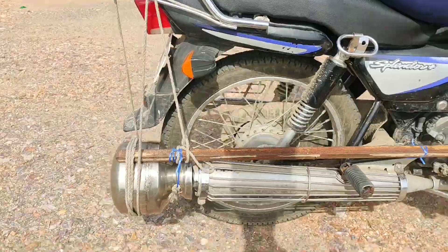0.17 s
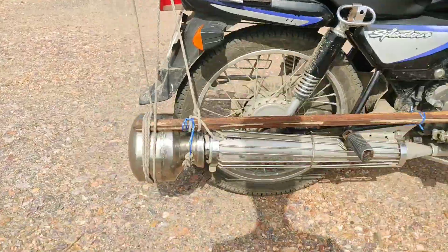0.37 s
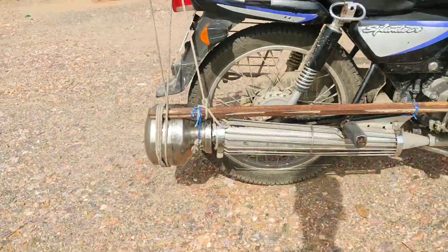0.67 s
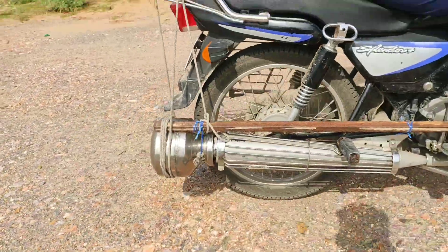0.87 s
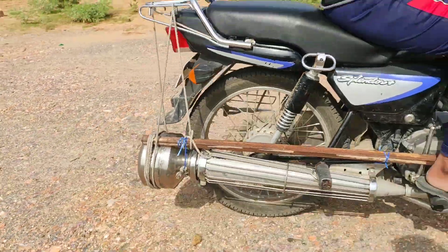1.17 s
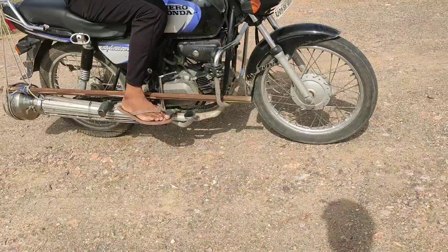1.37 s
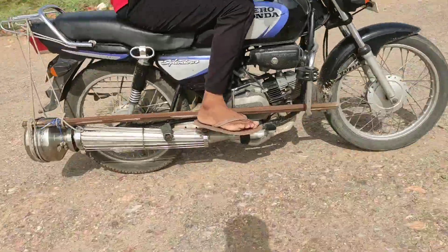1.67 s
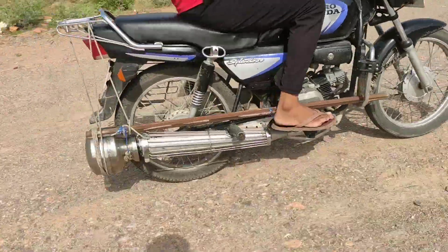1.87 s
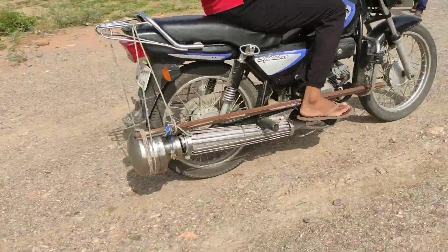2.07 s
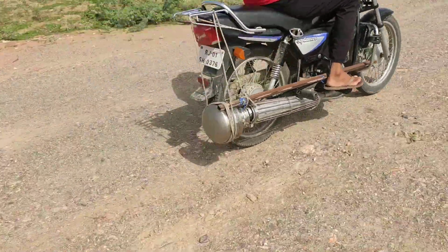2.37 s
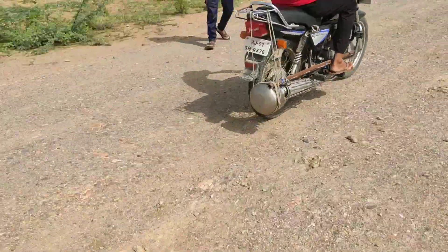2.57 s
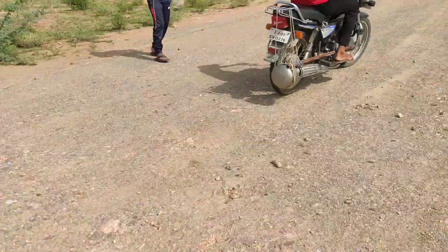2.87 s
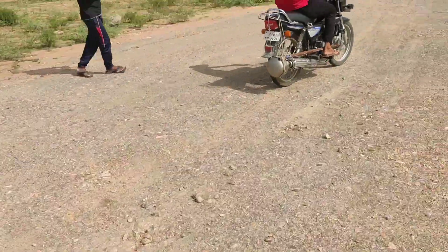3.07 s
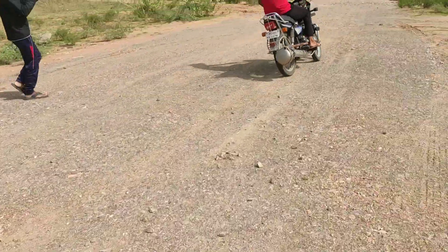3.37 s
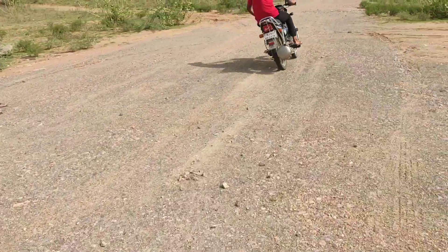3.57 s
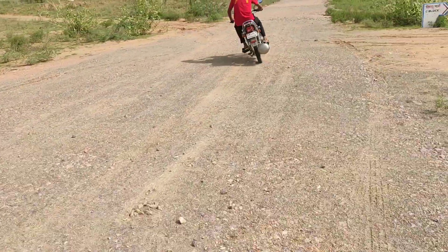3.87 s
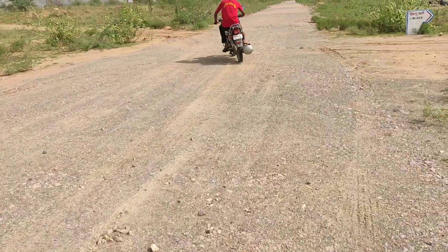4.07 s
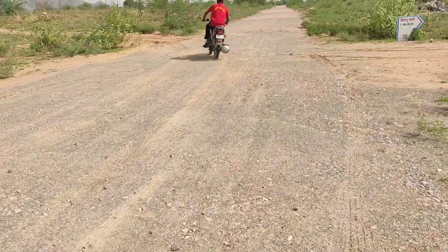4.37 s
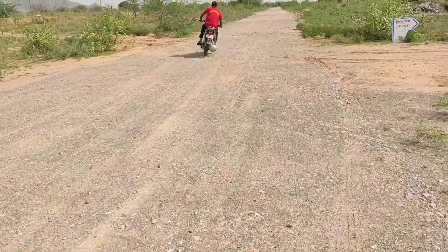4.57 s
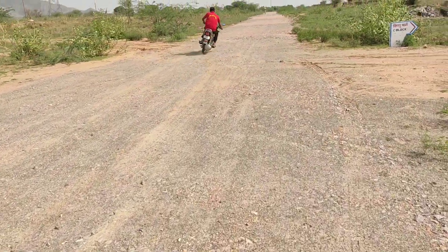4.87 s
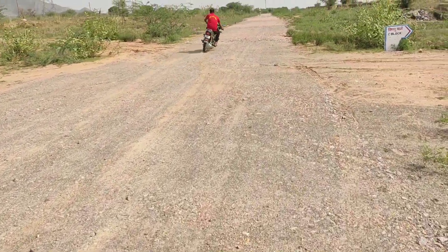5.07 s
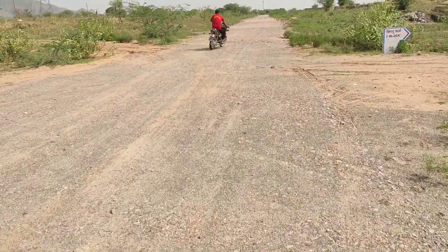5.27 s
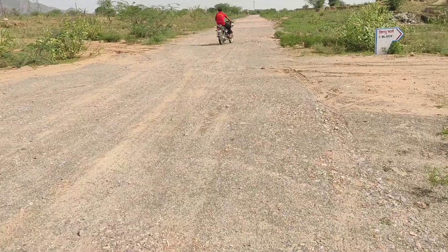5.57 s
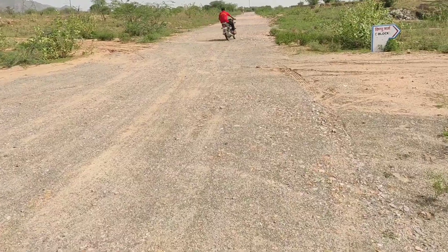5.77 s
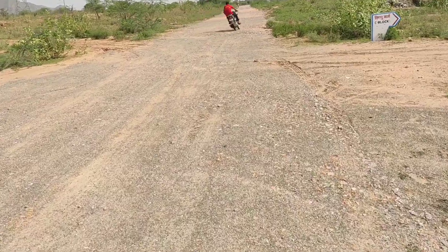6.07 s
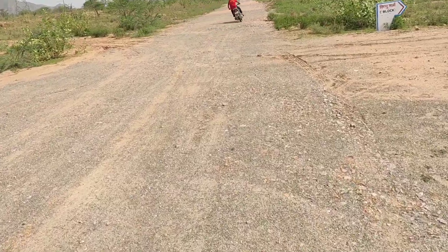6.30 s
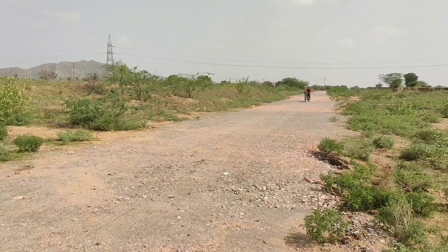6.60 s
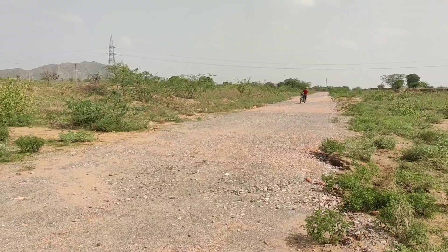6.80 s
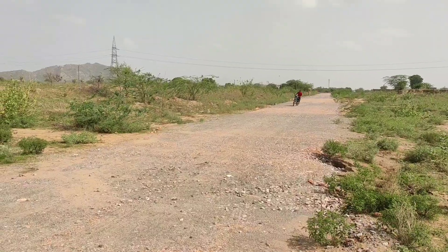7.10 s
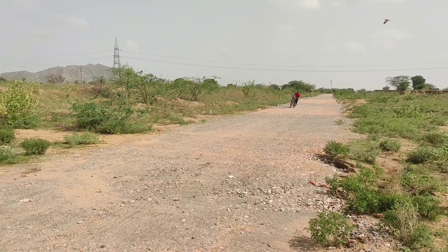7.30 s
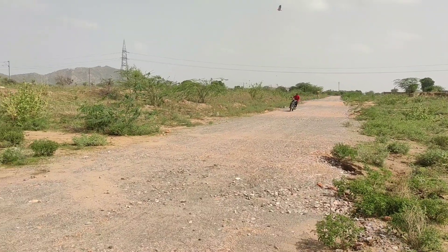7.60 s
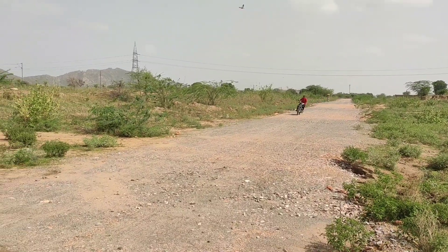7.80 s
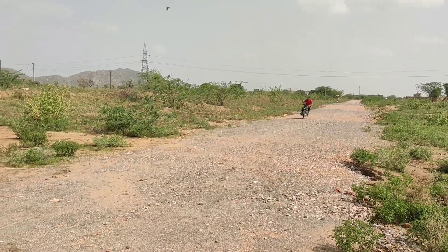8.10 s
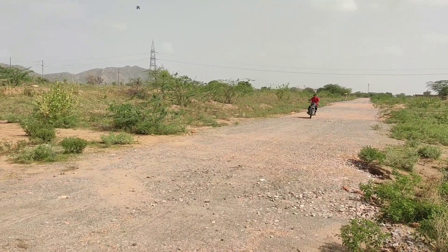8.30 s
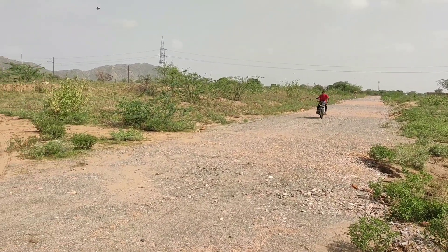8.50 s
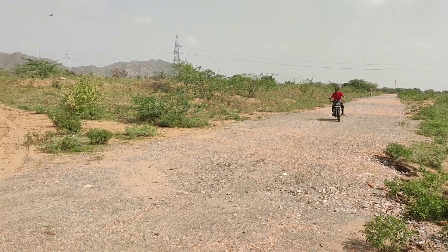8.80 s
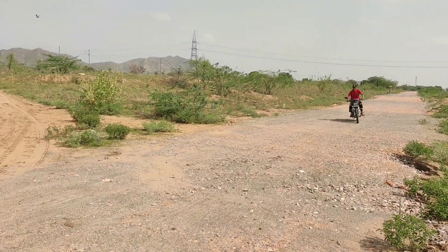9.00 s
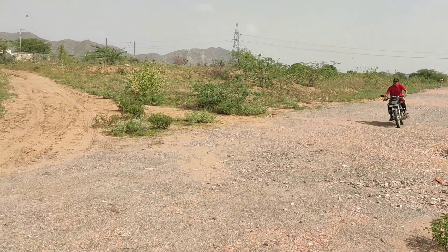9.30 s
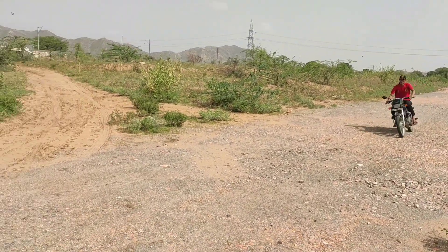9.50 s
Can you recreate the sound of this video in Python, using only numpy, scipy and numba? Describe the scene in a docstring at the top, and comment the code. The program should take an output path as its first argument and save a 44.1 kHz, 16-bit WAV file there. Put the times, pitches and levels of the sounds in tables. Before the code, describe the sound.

Slow pot-like clonks of an idling single-cylinder engine stop abruptly; a short gap, then a deep droning motorcycle ride with wind rumble and gear changes.

```python
"""An open gravel road: a small single-cylinder motorcycle with a steel pot tied over its exhaust.
It idles slowly close by, each firing a burst of decaying pot, pipe and casing modes plus gas noise, over
running-gear noise. It breaks off on a clank; after a short silence the same engine pulls under load through
two gear changes: firing pulses boom in resonators, while filtered noise gives wind, clatter and gear whine."""
import sys
import numpy as np
from scipy import signal
from scipy.fft import rfft, irfft
from scipy.io import wavfile
from scipy.ndimage import uniform_filter1d
from numba import njit

SR = 44100
rng = np.random.default_rng(int(sys.argv[2]) if len(sys.argv) > 2 else 0)


def persist_wave(psi):
    """Save psi, clipped to +-1, as 16-bit WAV."""
    counts = np.round(np.clip(psi, -1, 1) * 32767).astype(np.int16)
    wavfile.write(sys.argv[1], SR, np.atleast_2d(counts).T)


N = 425565

# Levels in the tables are relative; each layer sets its own balance.
# idle firings: t/s, pot ring level/dB, pipe thud level/dB, gas crack level/dB
IDLE_FIRINGS = [(0.038, -17.5, -30, -26.5), (0.225, -17.5, -30.5, -36), (0.397, -17, -30, -33),
                (0.572, -20, -31, -32), (0.765, -14.5, -30, -32), (0.951, -16.5, -31, -35.5),
                (1.12, -16.5, -29, -31.5), (1.295, -15.5, -29, -31.5), (1.474, -16, -29, -33.5),
                (1.653, -31, -38, -50), (1.856, -16, -27.5, -26.5), (2.004, -12.5, -31, -19)]
# valve ticks between firings: t/s, level/dB
VALVE_TICKS = [(0.0159, -36), (0.0704, -25), (0.1296, -35), (0.3087, -33.5), (0.4813, -32.5),
               (0.6644, -35.5), (0.855, -34), (1.0326, -32), (1.2057, -34), (1.3827, -35), (1.5604, -33),
               (1.712, -39), (1.7484, -36), (1.93, -29.5)]
# modes of the air in pipe and pot: f/Hz, level/dB, t60/s
PIPE_MODES = [(62.7, -0.5, 0.41), (112.9, 6, 0.18), (139, -6.5, 0.25), (95, -4.5, .06), (288.3, -20.5, .4)]
# modes of the pot wall: f/Hz, level/dB, t60/s
POT_MODES = [(465, -17, 0.12), (602, -11.5, 0.12), (815, 9.5, 0.042), (1066, 4, 0.067), (1153, 4.5, 0.027),
             (1480, -10.5, 0.13)]
# modes of the engine casing: f/Hz, level/dB, t60/s
CASING_MODES = [(1750, -6, .03), (1980, 0, .04), (2250, 0, .04), (2700, -1, .045), (3300, -6, .03),
                (3800, -8, .025), (4200, -2, .025), (4600, -4, .025), (4900, -4, .025), (5400, -8, .02),
                (8600, -12, .015), (9600, -14, .015)]
# spectrum of the running gear at idle: f/Hz, density level/dB per Hz
GEAR_SPECTRUM = [(88, -35), (150, -19.5), (191, -22.5), (348, -27), (820, -18), (1360, -22), (1520, -18.5),
                 (2510, -39.5), (4320, -31), (5820, -40), (9640, -48), (11200, -56), (13000, -71)]
# a loose part chattering through the first firing, one row: t/s, length/s, level/dB
LOOSE_PART = (.012, .068, -33)
# engine under load: t/s, firing rate f/Hz, exhaust level/dB
LOAD = [(2.17, 35.5, -18), (2.29, 35.6, -17.5), (2.42, 36.76, -16.5), (2.5, 37.32, -14.5),
        (2.79, 39.07, -16.5), (2.86, 40.3, -14.5), (2.92, 38.6, -15), (3.0, 38.24, -16.5),
        (3.06, 36.63, -18), (3.13, 35.75, -18), (3.17, 35.42, -17), (3.25, 34.05, -17), (3.29, 32.47, -17),
        (3.4, 27.74, -19), (3.42, 26.26, -17), (3.44, 25.92, -26.5), (3.46, 25.6, -17.5),
        (3.5, 26.28, -20.5), (3.54, 26.52, -17.5), (3.67, 26.87, -13.5), (3.71, 26.13, -14.5),
        (4.11, 27.75, -14), (4.34, 27.85, -16), (4.4, 28.13, -14.5), (4.73, 29.19, -15), (5.21, 30.82, -15),
        (5.29, 30.67, -17), (5.44, 31.7, -15.5), (5.5, 31.42, -19), (5.65, 31.87, -16), (5.71, 32.38, -17),
        (6.02, 33.28, -16), (6.79, 35.18, -16.5), (6.86, 35.58, -17.5), (6.9, 36.31, -16),
        (7.11, 37.03, -15), (7.75, 39.93, -16), (7.88, 39.33, -19.5), (7.9, 38.46, -19), (8.02, 35.72, -15),
        (8.06, 34.47, -19.5), (8.13, 33.72, -17.5), (8.19, 31.4, -19.5), (8.21, 31.1, -19.5),
        (8.25, 30.97, -18.5), (8.36, 30.65, -17), (8.42, 30.41, -18), (8.58, 31.1, -16),
        (8.71, 31.1, -16.5), (9.13, 31.7, -15), (9.23, 31.7, -14.5), (9.38, 31.7, -18), (9.5, 31.62, -16.5),
        (9.57, 31.8, -15), (9.65, 31.9, -17.5)]
# engine clatter under load: t/s, level/dB
CLATTER_LEVEL = [(2.17, -36), (2.42, -33), (2.64, -34), (2.79, -32), (3.41, -38), (3.55, -37.5),
                 (4.46, -38.5), (5.16, -34), (5.9, -37.5), (6.73, -35.5), (7.16, -31.5), (7.45, -33.5),
                 (7.47, -32), (8.01, -34), (8.24, -40), (8.36, -39.5), (8.63, -40), (8.75, -38.5),
                 (9.0, -38.5), (9.04, -36), (9.08, -39.5), (9.29, -41), (9.43, -39), (9.46, -41),
                 (9.56, -38.5), (9.58, -40)]
# spectrum of that clatter: f/Hz, density level/dB per Hz
CLATTER_SPECTRUM = [(240, -26), (400, -4), (573, -8.5), (782, -8.5), (851, -11.5), (1060, -8.5),
                    (1340, -14), (1570, -9), (2560, -15.5), (3990, -24), (4770, -28.5), (5510, -38.5),
                    (7000, -55.5), (9100, -82.5), (15400, -120)]
# casing buzz under load: f/Hz, width/Hz, level/dB
BUZZ_BANDS = [(1224, 120, 0.5), (2540, 550, -1), (4310, 120, -12.5), (4890, 450, -12.5)]
# exhaust colour over its level: t/s, upper over lower boom level/dB, bass level/dB, shoulder level/dB,
# bark level/dB, low gusts level/dB
EXHAUST_COLOUR = [(2.17, 0, -7.5, -17, -17, -5), (2.5, -6, -7, -14, -19.5, -6.5),
                  (2.85, -3.5, -13, -14.5, -20, -10), (3.15, -5.5, -6, -24, -23.5, -8),
                  (3.45, -4, -8, -10.5, -35, -11), (3.75, -4, -17, -15, -42.5, -9),
                  (4.2, -0.5, -18, -13, -36, -9), (4.7, 0, -14, -13.5, -45.5, -11),
                  (5.2, 1.5, -18, -11.5, -42, -3.5), (5.55, -0.5, -8, -14.5, -27.5, -4.5),
                  (6, -1.5, -8, -18, -28.5, -12), (6.5, -6, -8, -12.5, -26.5, -5),
                  (7, -5, -7.5, -12, -23.5, -7.5), (7.4, -5.5, -15, -11, -24.5, -8.5),
                  (7.8, 0.5, -9, -14.5, -21, 0), (8.1, -9.5, -8, -18, -26, -6.5),
                  (8.4, -4, -6.5, -23, -24.5, -17.5), (8.8, -2, -19.5, -18.5, -25, -5),
                  (9.2, -6.5, -12, -28.5, -24, -10), (9.65, -3, -12, -18.5, -23, -3.5)]
# wind over the exhaust and unevenness of firing: t/s, wind level/dB, timing scatter/cycles
WIND_AND_SCATTER = [(2.17, -14, .004), (2.8, -12, .004), (3.1, -6, .012), (3.5, -4, .02), (3.7, -13, .007),
                    (4.3, -15, .005), (5.2, -15, .005), (5.5, -8, .008), (7, -8, .008), (7.6, -6, .01),
                    (7.9, -3, .022), (8.15, -3, .022), (8.35, -8, .008), (9.65, -8, .009)]
# layers over the clatter: t/s, pot ring level/dB, casing ring level/dB, gear whine f/Hz,
# gear whine level/dB, rasp level/dB
CLATTER_LAYERS = [(2.17, -8, -5, 1736, -9, -18), (2.6, -2, -5, 1790, -10, -16),
                  (2.9, -5, -8, 1806, -16, -19), (3.25, -6, -8, 1778, -14, -17),
                  (3.45, -6.5, -9.5, 1790, -1, -21.5), (3.8, -0.5, -9.5, 1836, -4.5, -17),
                  (4.3, -8, -16, 1885, -6.5, -14), (4.6, -7.5, -9.5, 1924, -12, -22.5),
                  (5.1, -10.5, -16, 2096, -13, -13), (5.6, -12.5, -10.5, 2114, -25, -17),
                  (6, -10, -12.5, 1980, -23, -18), (6.6, -12.5, -19.5, 1995, -22.5, -13),
                  (7.2, -9.5, -24.5, 2030, -23.5, -5), (7.8, -4.5, -26.5, 1985, -16, -5.5),
                  (8.3, -5.5, -17, 2020, -25, -7.5), (9, -6.5, -14, 2006, -32.5, -10),
                  (9.65, -8, -14.5, 1984, -24, -12)]
# pipe note, shifting with gas heat and bearing: t/s, f/Hz
PIPE_NOTE = [(2.17, 152.3), (3.1, 149.8), (3.5, 128.6), (3.8, 157.7), (4.6, 162.4), (5.2, 168), (5.6, 147),
             (6.4, 142), (7.2, 154.6), (7.8, 156.6), (8.2, 140), (9, 155.3), (9.65, 145)]
# treble hiss over the clatter, lost with distance: t/s, level/dB
TREBLE_HISS = [(2.17, -30), (2.9, -33), (3.8, -30), (5.6, -29), (6, -42), (9.65, -46)]

CRACK_AFTER_S, THUD_AFTER_S = 0.0045, 0.0062  # gas crack and pipe thud, after the pot is struck
BREAK_S, RESUME_S = 2.0115, 2.1655  # idle cuts off, loaded engine comes in
POT_LAG_S = 0.0025  # the pot booms after the pipe
TOP_HZ = 15500  # upper limit of the microphone


def undb(db):
    """Decibels to amplitude."""
    return 10 ** (np.asarray(db) / 20)


def unit(x):
    """Scaled to rms 1."""
    return x / np.sqrt(np.mean(x ** 2))


def coloured(spectrum):
    """Noise with the given spectrum, rms 1."""
    hz, db = np.transpose(spectrum)
    log_f = np.log(np.arange(1, N // 2 + 2) * SR / N)
    gain = undb(np.interp(log_f, np.log(hz), db))
    return unit(irfft(rfft(rng.standard_normal(N)) * gain, N))


def walk(rate):
    """Random levels held 1 / rate s and slewed twice; spread near 1."""
    hold = int(SR / rate)
    steps = np.repeat(rng.standard_normal(N // hold + 1), hold)
    return 1.115 * uniform_filter1d(uniform_filter1d(steps, hold), hold)[:N]


def running_gear():
    """Moving parts at idle: a steady coloured noise whose level wanders."""
    return undb(-45.5 + 2.5 * walk(30)) * coloured(GEAR_SPECTRUM)


@njit
def svf(x, hz, width):
    """State-variable band-pass with a moving centre, gain 1 there."""
    y, band_state, low_state = np.empty(len(x)), 0., 0.
    for i in range(len(x)):
        g, k = np.tan(np.pi * hz[i] / SR), width / hz[i]
        v = (band_state + g * (x[i] - low_state)) / (1 + g * (g + k))
        band_state = 2 * v - band_state
        low_state += 2 * g * v
        y[i] = k * v
    return y


def band(x, hz, width_hz):
    """A resonance applied twice: steep skirts, slow build-up."""
    hz = hz * np.ones(N)
    return svf(svf(x, hz, 1. * width_hz), hz, 1. * width_hz)


def add(out, s, x):
    """Mixes x in at time s."""
    i = max(int(s * SR), 0)
    out[i:i + len(x)] += x[:N - i]


def puff(decay_s):
    """A burst of gas noise that swells over a few ms and dies away."""
    t = np.arange(SR // 4) / SR
    return rng.standard_normal(len(t)) * np.exp(-t / decay_s) * (1 - np.exp(-t / .004))


def ring(modes, scatter_db, detune, rise_s):
    """One blow on a set of modes, each struck a little differently; a softer push rises more slowly."""
    t = np.arange(SR // 2) / SR
    hz, db, t60 = np.transpose(modes)[:, :, None]
    pitch_chance, level_chance = rng.standard_normal((2, len(modes), 1))
    wave = np.sin(2 * np.pi * hz * (1 + detune * pitch_chance) * t)
    level = undb(db + scatter_db * level_chance - 60 * t / t60)
    return np.sum(level * wave, axis=0) * (1 - np.exp(-(t / rise_s) ** 2))


def knocks(modes, decay_s, scatter_db, detune):
    """A burst of tiny knocks rings the modes roughly, differently each time."""
    burst = puff(decay_s)[:SR // 20]
    blow = ring(modes, scatter_db, detune, 1e-4)[:SR // 8]
    return signal.fftconvolve(burst, blow) / np.sqrt(decay_s * SR)


def loose_part(gas):
    """A loose part chatters: noise that swells and fades as a rounded arch."""
    s, length_s, db = LOOSE_PART
    count = int(length_s * SR)
    arch = np.sin(np.pi * np.arange(count) / count) ** .5
    add(gas, s, undb(db) * rng.standard_normal(count) * arch)


def valve_tick(out, gas, s, db):
    """A valve knocks the casing with a short puff; a soft pot ring leads it by 20 ms."""
    add(out, s - .022, undb(db - 2) * ring(POT_MODES, 2.5, .02, .004))
    add(out, s - .002, undb(db - 1.5) * knocks(CASING_MODES, .007, 2.5, .05))
    add(gas, s - .002, undb(db - 3) * puff(.012))


def firing(out, gas, push, s, ring_db, thud_db, crack_db):
    """The firing rings the pot; just after, the gas cracks out and the pipe thuds."""
    add(gas, s - .025, undb(-49) * puff(.05))  # the intake hisses as the piston comes up
    add(out, s, undb(ring_db - 9) * ring(POT_MODES, 1.5, .015, .0012))
    add(push, s, undb(ring_db - 19.5) * puff(0.051))
    add(out, s + CRACK_AFTER_S, undb(crack_db + 14) * knocks(CASING_MODES, .005, 2.5, .04))
    add(gas, s + CRACK_AFTER_S, undb(crack_db) * puff(0.017))
    add(out, s + THUD_AFTER_S, undb(thud_db + 5) * ring(PIPE_MODES, 0.47, 0.02, 0.0029))


def pot_rattle(push):
    """The outflow keeps rattling the pot wall after the blow: gas noise through its modes."""
    return undb(14.5) * sum(undb(db) * band(push, hz, 195) for hz, db, _ in POT_MODES)


def idle():
    """Slow firings with valve ticks between them, over the running gear."""
    out, gas, push = np.zeros(N), np.zeros(N), np.zeros(N)
    loose_part(gas)
    for s, db in VALVE_TICKS:
        valve_tick(out, gas, s, db)
    for s, ring_db, thud_db, crack_db in IDLE_FIRINGS:
        firing(out, gas, push, s, ring_db, thud_db, crack_db)
    treble_cut = signal.butter(8, 10300, fs=SR, output="sos")
    gas = signal.sosfilt(treble_cut, band(gas, 2870, 10000))
    return out + gas + pot_rattle(push) + running_gear()


def along(table):
    """Columns of a curve table, one value a sample."""
    s, *columns = np.transpose(table)
    return [np.interp(np.arange(N) / SR, s, c) for c in columns]


def late(x, s):
    """Delayed by s."""
    return np.interp(np.arange(N) - s * SR, np.arange(N), x)


def firing_pulses(turns, hz):
    """One click as each cycle completes, its strength slightly uneven, evened out for firing rate."""
    fired = np.flatnonzero(np.diff(np.maximum.accumulate(np.floor(turns))))
    pulses = np.zeros(N)
    pulses[fired] = undb(1.1 * rng.standard_normal(N // 500)[:len(fired)])
    return pulses / np.sqrt(hz)


def wind(gusts_db):
    """Wind rumble with lower gusts: two low bands of one noise, each wandering in level."""
    air = rng.standard_normal(N)
    rumble = unit(band(band(air, 165, 190), 165, 240))
    gusts = unit(band(band(air, 60, 90), 60, 110))
    rumble_db = along(WIND_AND_SCATTER)[0]
    return undb(rumble_db + 2 * walk(9)) * rumble + undb(gusts_db + 2 * walk(6.8)) * gusts


def exhaust(turns, hz):
    """Firings boom in pipe and then pot, with a bass push below and a bark above; wind rumbles through."""
    upper_db, bass_db, shoulder_db, bark_db, gusts_db = along(EXHAUST_COLOUR)
    pulses = firing_pulses(turns, hz)
    pipe = unit(band(band(pulses, along(PIPE_NOTE)[0], 100), 151.4, 160))
    pot = late(unit(band(band(pulses, 216.2, 86), 211, 130)), POT_LAG_S)
    boom = (pipe + undb(upper_db) * pot) / np.sqrt(1 + undb(2 * upper_db))
    bass = undb(bass_db) * late(unit(band(band(pulses, 50, 55), 50, 70)), 0.0014)
    shoulder = undb(shoulder_db) * late(unit(band(pulses, 292.6, 77)), 0.00584)
    bark = undb(bark_db) * late(unit(band(pulses, 440, 100)), 0.007105)
    growl = undb(bark_db - 9) * late(unit(band(pulses, 720, 260)), .008)
    return boom + bass + shoulder + bark + growl + wind(gusts_db)


def casing_buzz(noise):
    """The casing buzzes under load: noise through a few of its resonances."""
    return unit(sum(undb(db) * unit(band(noise, hz, width)) for hz, width, db in BUZZ_BANDS))


def gear_whine(noise, hz):
    """A narrow noise band that slides in pitch."""
    return unit(band(noise, hz, 110))


def engine_clatter():
    """Broad clatter with hiss, pot ring, casing buzz, gear whine and rasp, all resonances of noise."""
    pot_db, casing_db, whine_hz, whine_db, rasp_db = along(CLATTER_LAYERS)
    noise = rng.standard_normal(N)
    hiss_db = along(TREBLE_HISS)[0] + 2.5 * walk(30)
    hiss = undb(hiss_db) * unit(band(band(noise, 7200, 2200), 7200, 2600))
    pot = undb(pot_db) * unit(band(noise, 787, 64))
    casing = undb(casing_db) * casing_buzz(noise)
    whine = undb(whine_db) * gear_whine(noise, whine_hz)
    rasp = undb(rasp_db + 3 * walk(60)) * unit(band(rng.standard_normal(N), 1050, 770))
    return coloured(CLATTER_SPECTRUM) + hiss + pot + casing + whine + rasp


def ride():
    """Exhaust below; clatter, buzz and gear whine swell slightly once a cycle above."""
    hz, boom_db = along(LOAD)
    clatter_db, = along(CLATTER_LEVEL)
    running = np.arange(N) > RESUME_S * SR
    turns = np.cumsum(hz * running) / SR + .95  # in firing cycles
    turns += along(WIND_AND_SCATTER)[1] * walk(30)  # uneven timing
    swell = 1 + 0.052 * np.cos(2 * np.pi * (turns - .3))
    clatter_gain = undb(clatter_db + 1 + 0.43 * walk(20)) * swell
    return undb(boom_db) * exhaust(turns, hz) + clatter_gain * engine_clatter()


def scene():
    """Idle until the break, silence, then the engine under load."""
    t = np.arange(N) / SR
    fade_in = np.clip((t - RESUME_S) / 0.0012, 0, 1)
    return (idle() * (t < BREAK_S) + ride() * fade_in)[None]


def record(dry):
    """The microphone rounds the loudest peaks and cuts the top."""
    top_cut = signal.ellip(8, .2, 70, TOP_HZ, fs=SR, output="sos")
    return signal.sosfilt(top_cut, np.tanh(0.73 * dry) / 0.81)


dry = scene()
out = record(dry)
persist_wave(out)
```